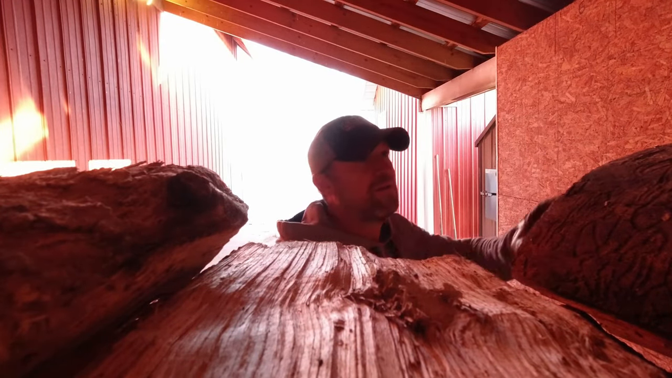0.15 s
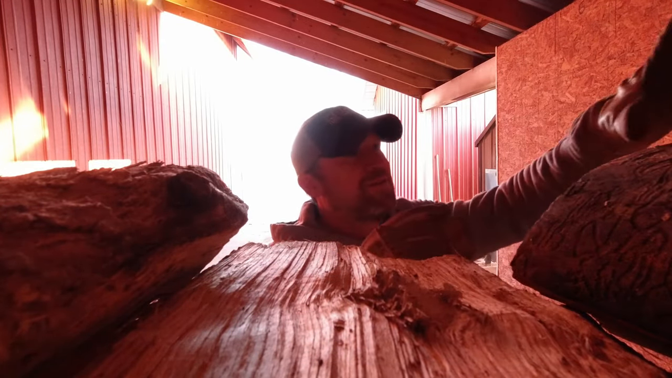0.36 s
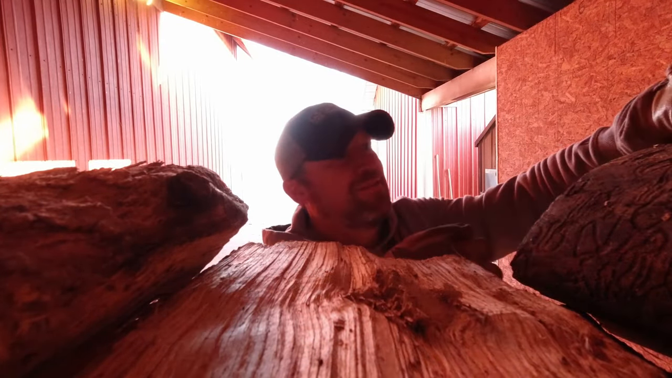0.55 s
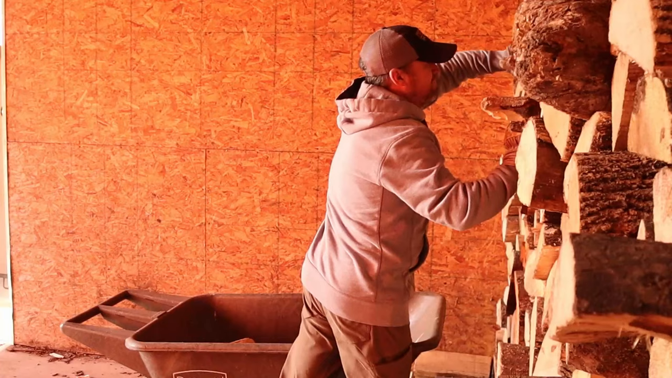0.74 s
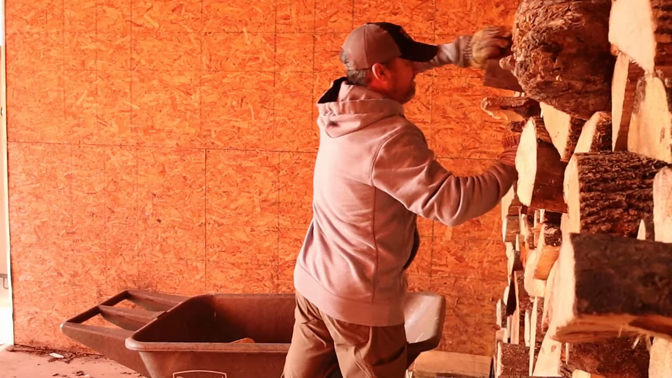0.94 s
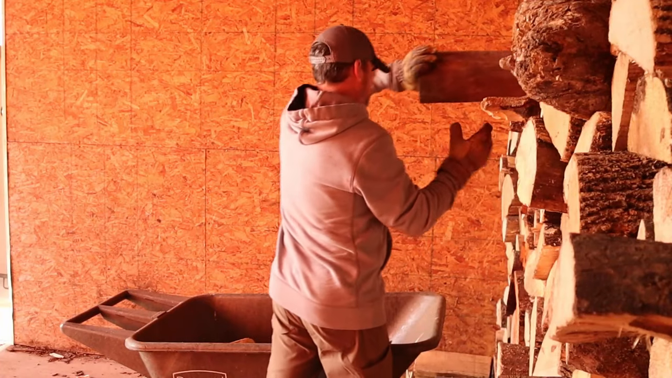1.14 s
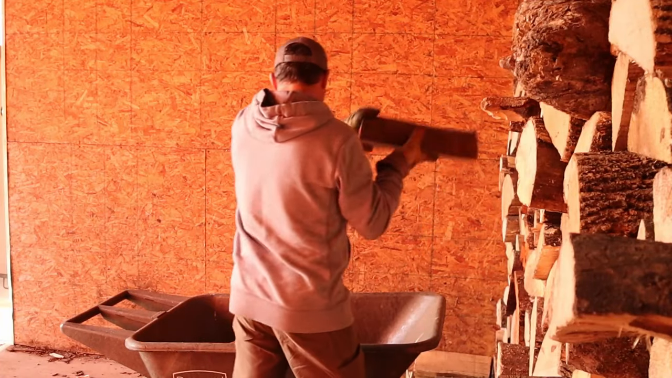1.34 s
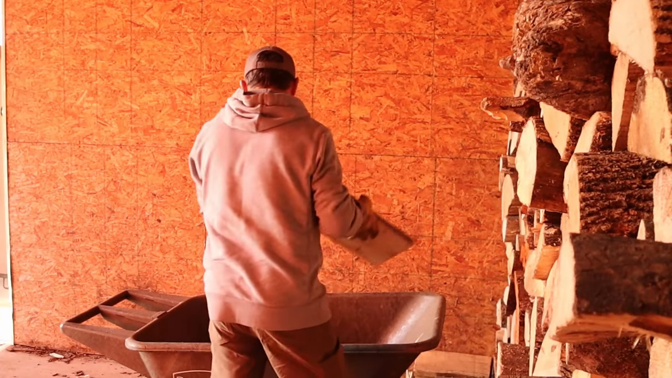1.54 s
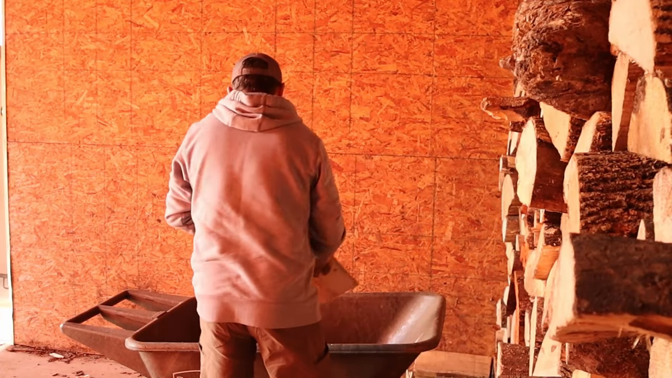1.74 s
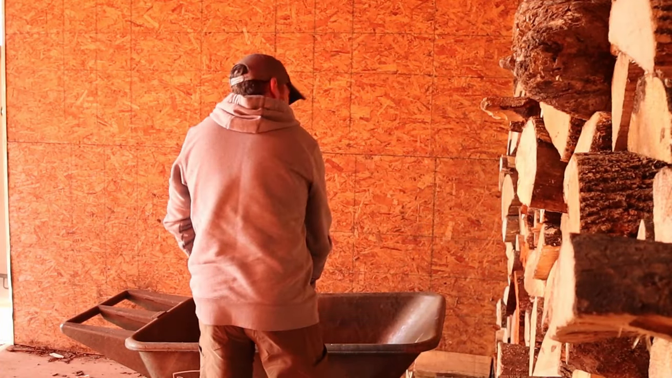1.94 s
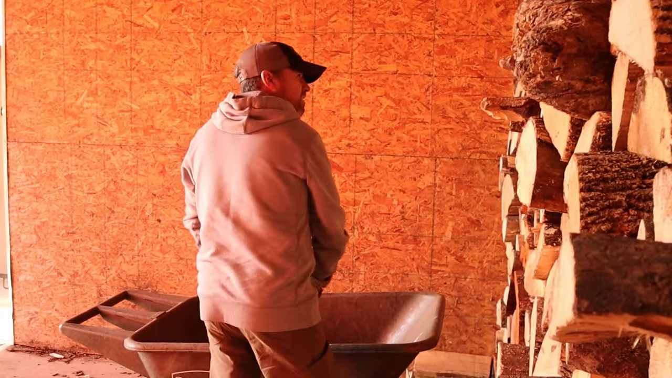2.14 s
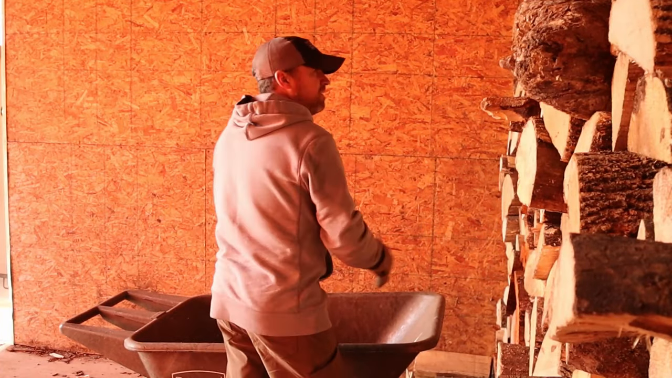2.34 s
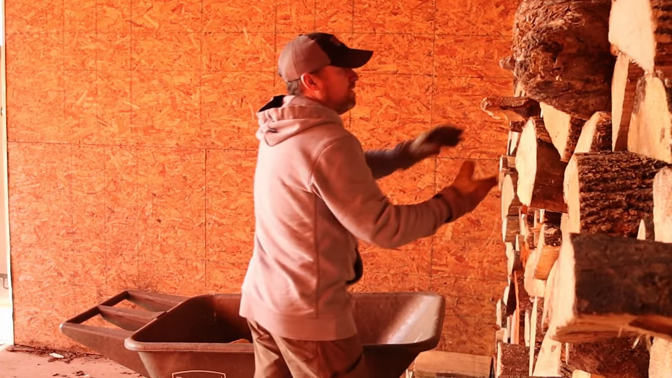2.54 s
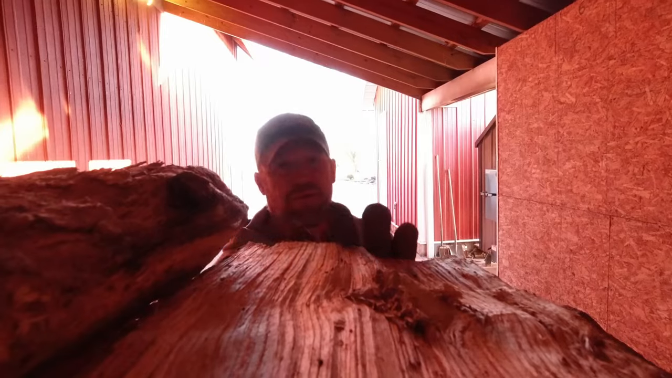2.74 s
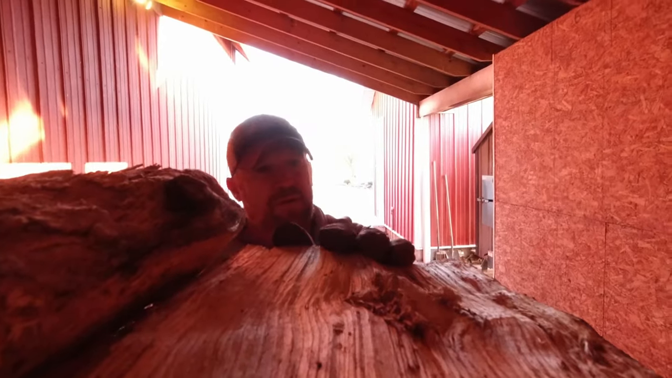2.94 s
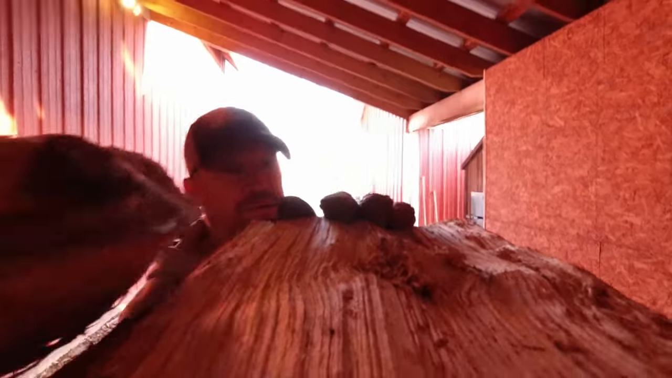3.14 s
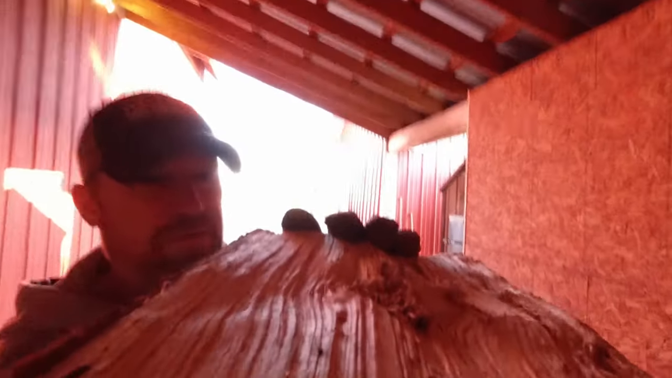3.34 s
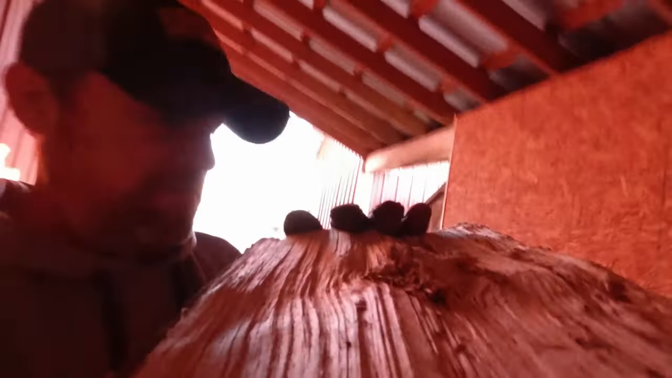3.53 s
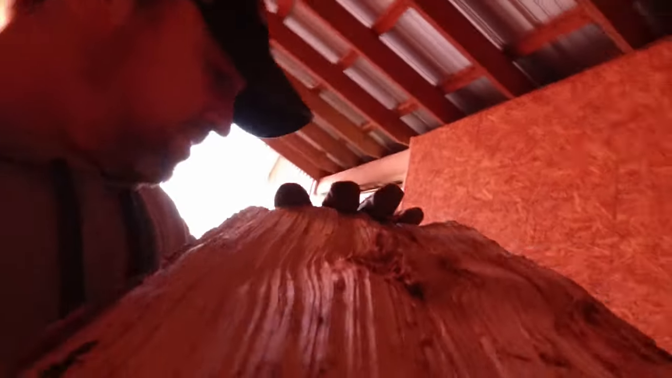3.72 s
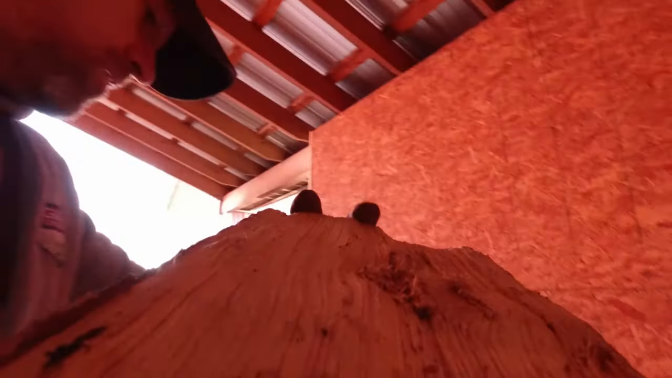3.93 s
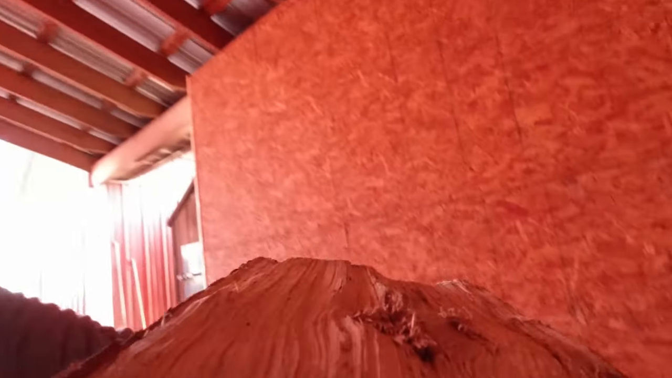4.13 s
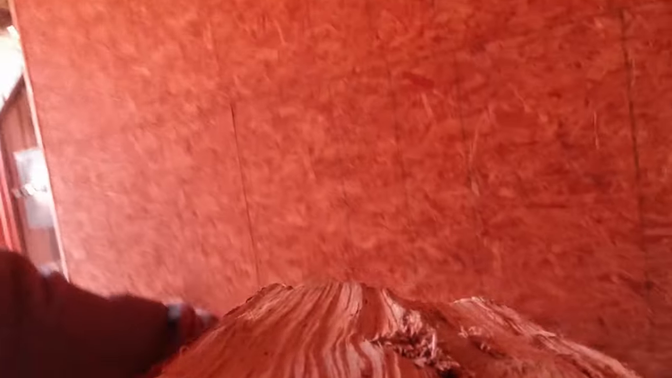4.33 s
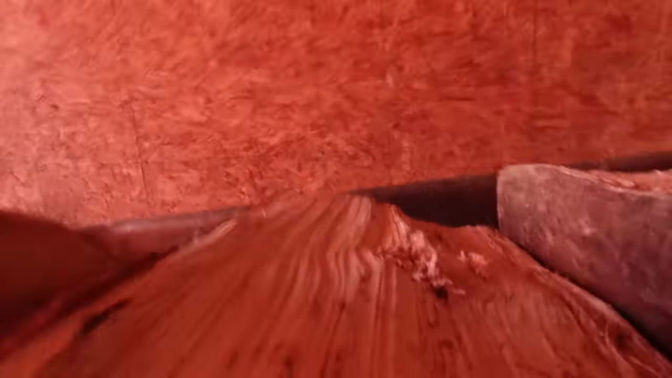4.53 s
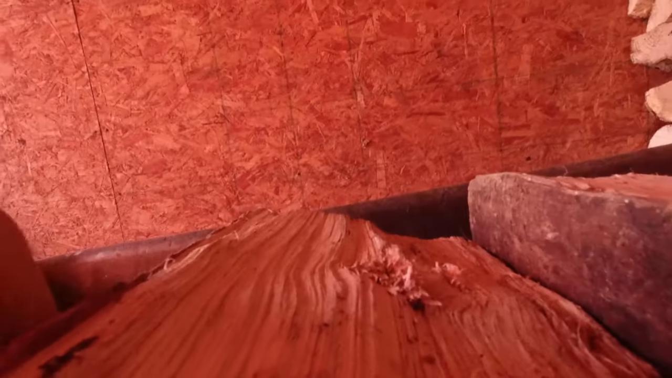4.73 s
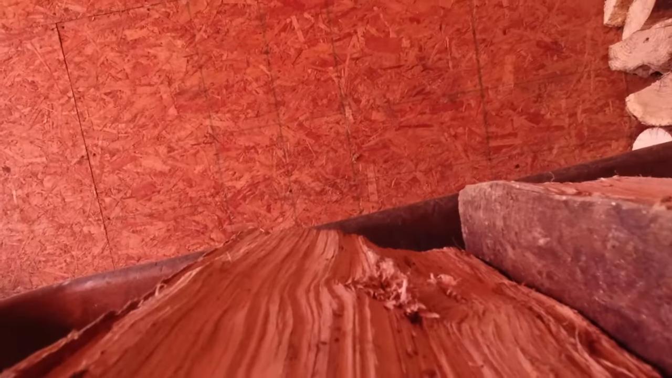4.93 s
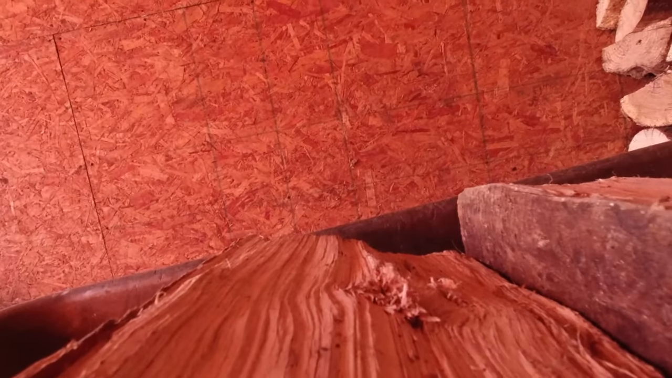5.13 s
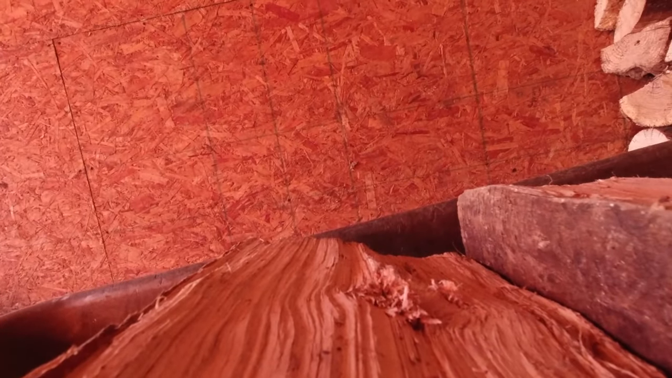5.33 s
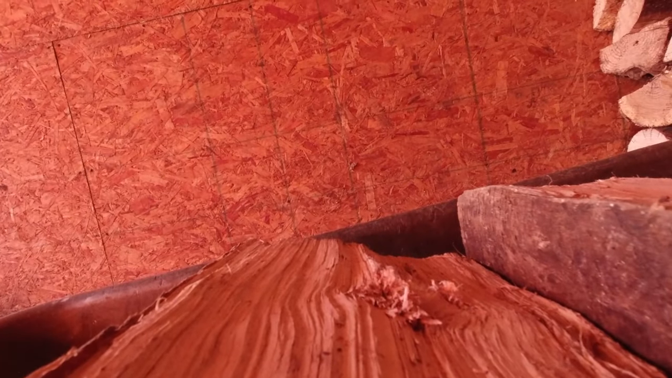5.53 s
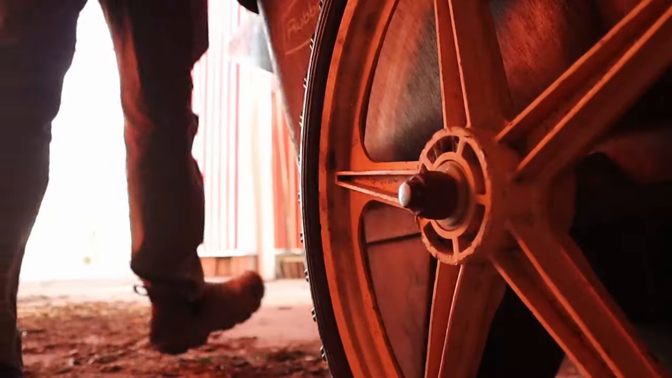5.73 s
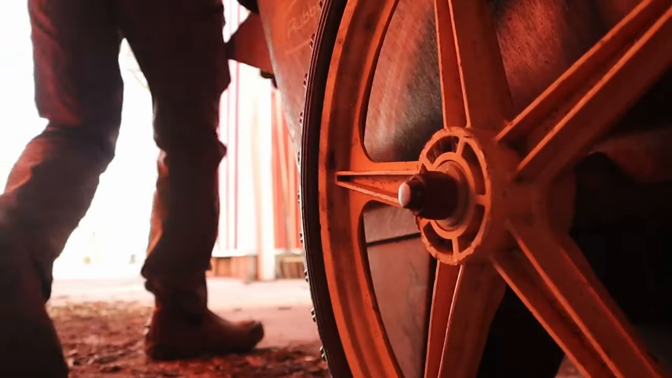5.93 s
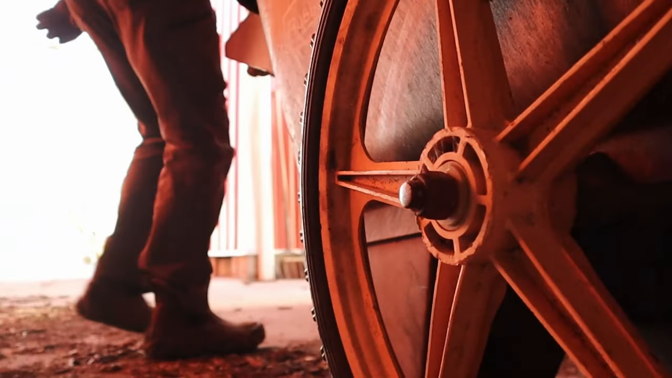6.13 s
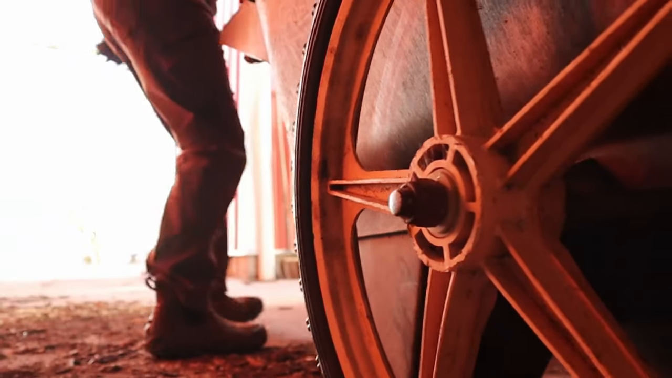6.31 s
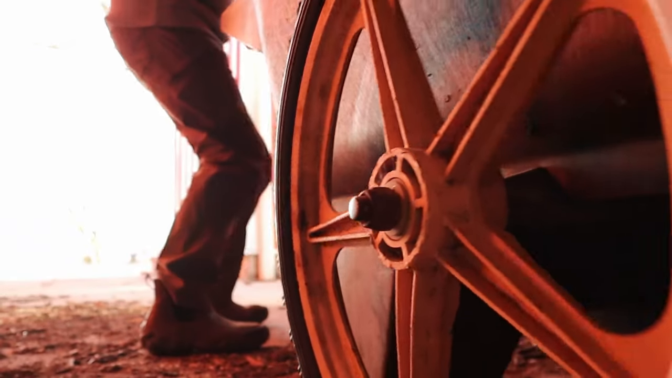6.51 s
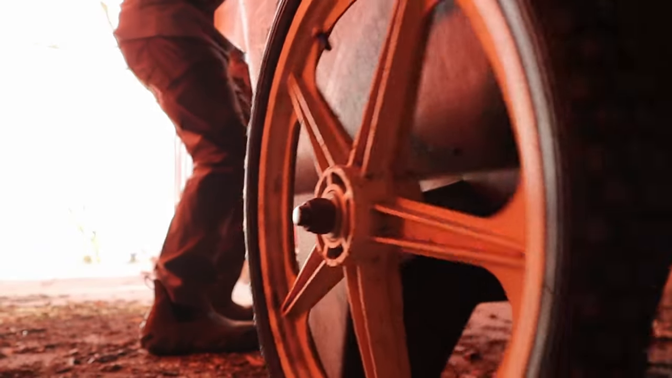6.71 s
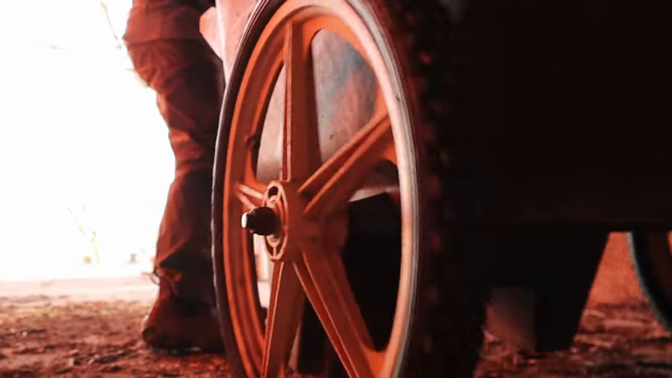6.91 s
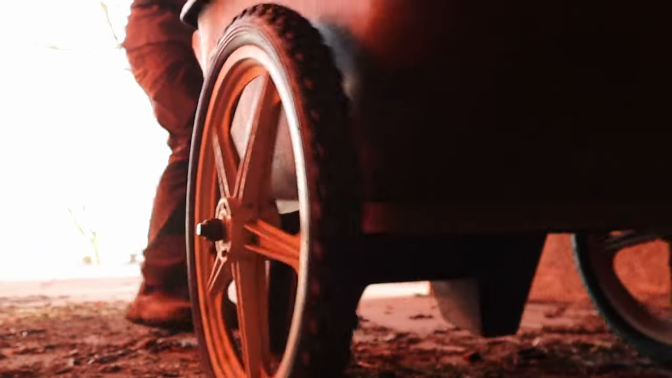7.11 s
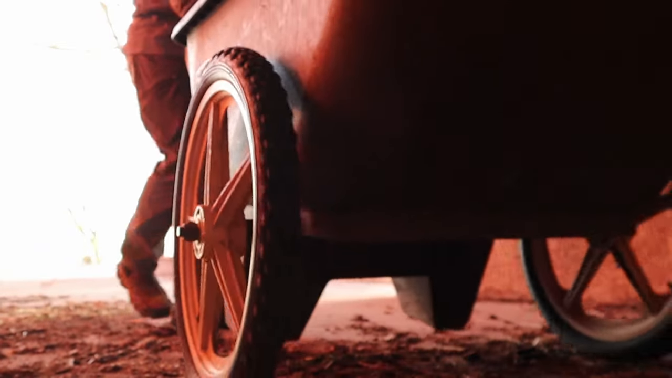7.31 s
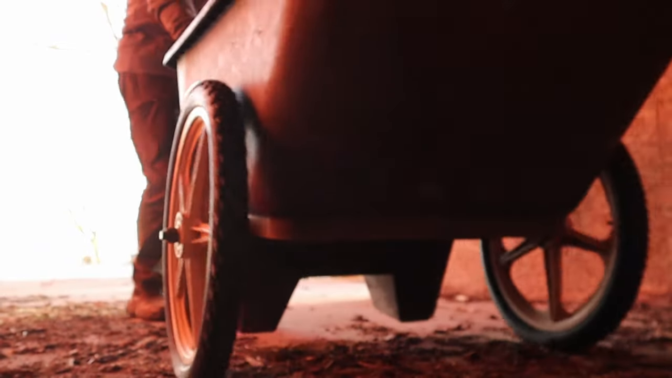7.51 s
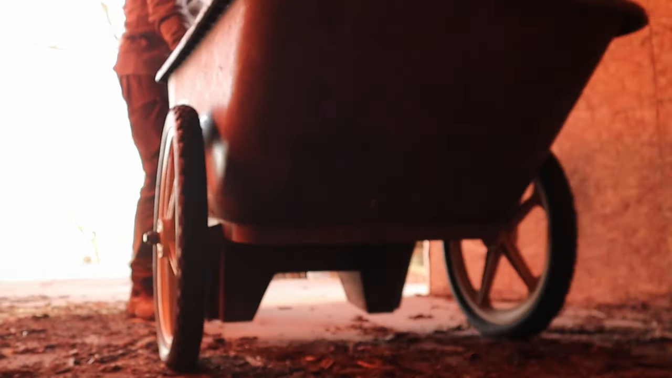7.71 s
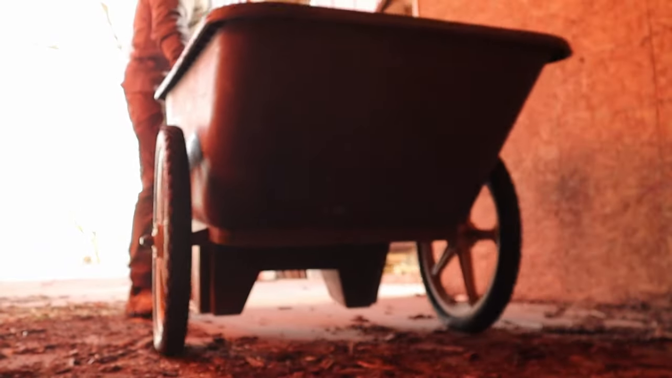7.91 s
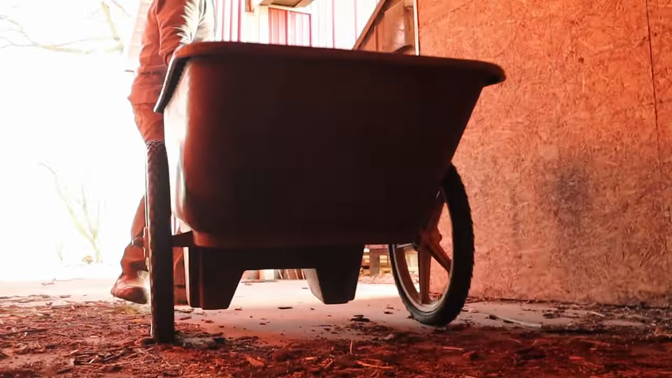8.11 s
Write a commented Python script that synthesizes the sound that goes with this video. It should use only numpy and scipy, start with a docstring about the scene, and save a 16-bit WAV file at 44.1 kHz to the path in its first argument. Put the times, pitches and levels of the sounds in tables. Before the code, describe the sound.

Three firewood drops into a deep plastic tub, each a hard woody crack with quick bounces and a low hollow boom, separated by dry scraping of gloves and bark and small knocks. The shed adds a short, faint tail. Then a sudden quiet cut to the floor beside the wheel: faint boot steps, followed by dense grinding and crackling of tyres on bark chips, with the load jolting and knocking.

```python
"""Wooden shed: split logs are pulled off a stack and dropped into a plastic cart; the hollow tub booms.
Gloves and bark scrape between drops, then the loaded cart rolls off over bark chips, crunching and knocking.
Blows are decaying noise bursts plus woody rings that push the tub's modes; scrapes are coloured noise
with tiny slips; the low modes are narrow noise and tones swelled by jolts; sparse taps make the shed's tail."""
import sys
import numpy as np
from scipy import signal
from scipy.fft import rfft, irfft
from scipy.io import wavfile
from scipy.ndimage import uniform_filter1d

SR = 44100
rng = np.random.default_rng(int(sys.argv[2]) if len(sys.argv) > 2 else 0)


def put_to_file(sound):
    """Save the sound as 16-bit audio at rate SR, in the file named by the first command-line argument."""
    columns = np.atleast_2d(sound).T  # one column per channel
    safe = np.clip(columns, -1, 1)
    whole_steps = np.round(safe * 32767)
    wavfile.write(sys.argv[1], SR, whole_steps.astype(np.int16))


N = 364266
ROLL_S = 5.71  # from here the microphone lies on the floor by the wheel

# logs landing and bouncing in the tub: [start_s, level_db, ring_hz, thump_db, crack_db, ring_db],
# the last three relative to level_db
DROPS = [(0.011, -12, 635, 1.5, -23, -8), (0.029, -20, 590, 11.5, -18, 0),
         (0.056, -15.5, 786, 3, -50, -4.5), (0.16, -21.5, 447, 12, -47, 2), (0.192, -22, 524, 15, -39, 1.5),
         (0.213, -30.5, 656, 3, -30, 8), (2.135, 4, 545, 0.5, -17, -5.5), (2.148, -3.5, 605, 4, -20, -3),
         (2.163, -2.5, 423, 5, -21, -3), (2.189, -4, 1170, -20, -9, -7.5), (2.223, -21, 1150, 12, -26, -9),
         (2.259, -5.5, 485, -13, -24, -7), (2.294, -17.5, 1260, 0.5, -18, 1.5),
         (2.323, -19, 665, 20.5, -29, 3.5), (2.359, -11.5, 577, -3, -34, -4.5),
         (2.389, -14.5, 570, -11, -35, -10), (2.468, -18.5, 645, -0.5, -40, -5.5),
         (2.499, -25, 660, 4, -37, -1.5), (4.535, -5.5, 980, -22, -9.5, -10.5),
         (4.55, 3.5, 407, -3.5, -11.5, -10), (4.57, -7.5, 745, -9, -25, -9), (4.629, -5, 925, -4, -10, -6),
         (4.649, -14.5, 890, 6.5, -21, -10), (4.689, -16, 710, 8.5, -16, -1),
         (4.729, -19, 670, 7, -38, 0.5), (4.749, -11.5, 1030, -6, -41, -6.5)]
# dull part of a log blow: [freq_hz, gain_db]
BLOW_BODY = [(150, -40.5), (250, 3), (403, 5), (473, -6.5), (764, -5.5), (861, 1), (920, -5.5), (3480, -23),
             (6000, -43.5), (7800, -66.5), (13200, -120)]
# bright edge of a log blow: [freq_hz, gain_db]
BLOW_CRACK = [(1200, -35), (2200, 7), (3200, 6), (5000, -4), (8000, -8.5), (12000, -14), (15700, -14.5)]


def drops():
    """Logs hit the tub: hard strikes, long rings, full boom."""
    return blows(DROPS, BLOW_BODY, BLOW_CRACK, cycles=10.3, overtone_db=-12.0, strike=3.9, splinter=0.36,
                 tub_db=-8.5, damping=1.07, shed_db=-6.5, t60_1khz_s=0.089)


# logs knocked while handled, and steps: columns as DROPS
# [start_s, level_db, ring_hz, thump_db, crack_db, ring_db]
TAPS = [(0.744, -18.5, 387, -15, -31, -2.5), (0.802, -20, 960, -32, -7, -1), (0.959, -28, 1570, -9, -24, 0),
        (1.028, -33, 1450, -27, -36, 3.5), (1.193, -23.5, 1470, -26, -24, 3),
        (1.227, -25, 1163, -2, -22, -8), (1.345, -18.5, 387, 7.5, -34, -8), (1.363, -23, 415, -4, -30, 1),
        (1.605, -20.5, 795, -20, -6, -2), (1.851, -33, 506, -21, -26, -3),
        (2.956, -33, 1600, -25, -27, 1.5), (3.162, -37.5, 2020, -17, 4, -3), (3.225, -37, 700, -12, 2, 3),
        (3.278, -36, 2120, -10, 6.5, -1.5), (3.441, -16.5, 1870, -1.5, -5, -1),
        (3.476, -36, 2400, -5, 8, 0), (3.59, -32, 525, 9.5, -26, -17), (3.633, -24.5, 1400, 0.5, 2.5, -1.5),
        (3.705, -20, 950, -14, -13, -1), (3.719, -20, 960, -40, -22, -3), (3.85, -36.5, 1020, -12, 9, 0),
        (3.894, -39.5, 3140, -34, 4, 7), (4.137, -24, 650, -8.5, -21, -1.5),
        (4.433, -34, 650, -18.5, -13, -3.5), (5.008, -31, 636, -15, -19, -1),
        (5.083, -27, 1100, -14, -3, 3.5), (5.574, -37.5, 423, -19.5, -17, 3),
        (5.593, -47, 412, -29, -11, -6), (5.836, -41.5, 1350, -19, 4, -1),
        (5.901, -26.5, 1510, -7, -8.5, -8), (5.927, -25.5, 1320, -30, -32, 0),
        (6.144, -37, 1470, -19.5, -25.5, -5)]


def taps():
    """Knocks and steps: the same wood spectra, shorter rings, tub more damped."""
    return blows(TAPS, BLOW_BODY, BLOW_CRACK, cycles=9.1, overtone_db=-9.0, strike=3.7, splinter=0.74,
                 tub_db=-3.3, damping=2.2, shed_db=-10.0, t60_1khz_s=0.036)


# bark chips cracking under the wheels and the load jolting: columns as DROPS
# [start_s, level_db, ring_hz, thump_db, crack_db, ring_db]
CRUNCH = [(6.224, -38, 1490, -7, -22, -1), (6.251, -23, 1380, -25, -18, -4),
          (6.318, -33.5, 1440, -26, -20, -3), (6.352, -23.5, 1440, -32, -44, -10),
          (6.402, -31.5, 560, -2, -18, -12), (6.437, -15.5, 462, -27, -16, -7),
          (6.454, -13, 1200, -20, -18, -16), (6.464, -19, 1235, -24, -28, 5),
          (6.479, -10.5, 1520, -19, -25, -4.5), (6.496, -14, 1060, -24, -25, -3),
          (6.51, -3.5, 1600, -34.5, -16, -4.5), (6.735, -30, 1200, -10, -24, -8),
          (6.788, -16.5, 1237, -7, -31, -7), (6.815, -8, 437, -27, -18.5, -10),
          (6.859, -4.5, 1290, -40, -36.5, -3), (6.877, -1, 1350, -37, -30, -10.5),
          (6.908, -26.5, 405, -8, -30, 4), (6.976, -11.5, 414, -17, -37, -8.5),
          (7.014, -2.5, 2090, -34, -15, -3.5), (7.039, -5.5, 1440, -18, -23, -4),
          (7.095, -15, 1370, -15.5, -16, -0.5), (7.141, -4.5, 1325, -55, -14, 0),
          (7.162, -2.5, 1400, -39, -22, -9), (7.17, -5.5, 1146, -27, -28, -2.5),
          (7.192, -5, 2100, -32, -19.5, -5), (7.206, -10, 1450, -28, -23, 2),
          (7.275, -14, 467, -1, -18, -2.5), (7.303, -3, 1900, -11, -44, -3),
          (7.325, -6, 704, -21, -9.5, -4), (7.372, 3.5, 460, -23, -10.5, -14),
          (7.384, -1.5, 546, -30, -24, -7), (7.395, -1, 710, -32.5, -18, -4),
          (7.456, -13, 740, -17, -37, -0.5), (7.545, -21, 730, -20, -41, -2), (7.611, -27, 690, 2, -15, -2),
          (7.659, -16, 630, 0, -6.5, -11), (7.682, -8, 910, -11, -16, -9),
          (7.708, -6, 1290, -37, -10.5, -17), (7.725, -7.5, 1140, -23, -7, -14),
          (7.739, -7.5, 696, -21, -32, -7.5), (7.856, -10.5, 2740, -27.5, -38, -0.5),
          (7.861, -5.5, 890, -2, -7, -5), (7.886, -9.5, 1170, -25, -3.5, -6),
          (7.903, -3.5, 743, -11, -36, 0.5), (7.918, -14, 390, -24, -32, 3),
          (8.045, -17, 686, -20.5, -20, -3.5), (8.091, -4.5, 740, -29, -12.5, -6),
          (8.109, -2, 930, -32, -13, -5.5), (8.128, -6.5, 700, -30, -20, -3),
          (8.149, -9.5, 820, -5.5, -6, -0.5), (8.164, -11, 627, -29, -20, -3),
          (8.219, -9, 1074, -43, -7.5, -7.5), (8.241, -20.5, 990, -3, -11, 0)]
# dull part of a crunch: [freq_hz, gain_db]
CRUNCH_BODY = [(180, -22), (300, -2), (605, -2), (704, -2), (999, -3.5), (1240, 1), (1780, -4),
               (2040, -3.5), (6000, -40), (7800, -64), (13200, -120)]
# bright edge of a cracking chip: [freq_hz, gain_db]
CHIP_CRACK = [(1200, -27), (2200, 3.5), (3500, -0.5), (6000, -18.5), (10000, -19.5), (12500, -46),
              (15700, -47)]


def crunches():
    """Chips crack and the load jolts: the most ragged bursts."""
    return blows(CRUNCH, CRUNCH_BODY, CHIP_CRACK, cycles=8.9, overtone_db=-20.0, strike=6.2, splinter=1.0,
                 tub_db=-7.0, damping=1.25, shed_db=-10.5, t60_1khz_s=0.067)


def blows(rows, dull, bright, cycles, overtone_db, strike, splinter, tub_db, damping, shed_db, t60_1khz_s):
    """Each blow: strike, ragged burst, bright crack, woody ring and a push into the tub; then the shed."""
    body, edge, wood, push = np.zeros((4, N + 5000))
    t = np.arange(5000) / SR
    impulse = t == 0
    for start_s, level_db, hz, thump_db, crack_db, ring_db in rows:
        body_noise, edge_noise, ring_noise, tear_noise = rng.standard_normal((4, len(t)))
        t60_s = np.clip(t60_1khz_s * (1000 / hz) ** 0.24, .005, .14)  # higher pieces die sooner
        fall = amp(-60 * t / t60_s) * np.minimum(t / 0.00088, 1)
        tears = (tear_noise > 2.6) * abs(body_noise)  # fibres give way in jerks
        fall *= 1 + splinter * signal.lfilter([1], [1, -.985], tears)
        hit = strike * impulse
        ring = resonate(ring_noise * fall + hit, hz, hz / cycles)
        overtone = resonate(ring_noise * fall, hz * rng.uniform(1.23, 2.27), 3 * hz / cycles)
        ring = ring + amp(overtone_db) * overtone
        thump = 0.4 * ring_noise * fall ** 2 / np.linalg.norm(fall ** 2) - impulse

        first = round(start_s * SR)
        span = slice(first, first + len(t))
        body[span] += amp(level_db) * (body_noise * fall + .5 * hit) / 4
        edge[span] += amp(level_db + crack_db) * (edge_noise * fall ** 1.38 + hit) / 2
        wood[span] += amp(level_db + ring_db) * peaked(resonate(ring, 1.21 * hz, 1.23 * hz))
        push[span] += amp(level_db + thump_db) * thump
    boom = signal.oaconvolve(push, tub(damping))[:N]
    hollow = band(wood[:N] + amp(tub_db) * boom, 64.0, 11000.0)
    dry = causal(body, dull) + causal(edge, bright) + hollow
    return dry + amp(shed_db) * shed(dry)


# tub modes: [freq_hz, gain_db, t60_s at damping 1]
TUB = [(54.3, -47.5, .25), (119, -34, 0.063), (129.9, -8.5, 0.24), (190.3, 1.5, 0.056), (250.4, 0, 0.09),
       (330, 0, 0.096), (412, -12, 0.17)]


def tub(damping):
    """Impulse response of the hollow tub: a sum of decaying modes."""
    t = np.arange(SR // 2) / SR
    modes = sum(amp(gain_db - 60 * damping * t / t60_s) * np.cos(2 * np.pi * hz * t)
                for hz, gain_db, t60_s in TUB)
    return modes * np.minimum(t / 0.0024, 1)


# narrow resonances heard during timed spans: [start_s, end_s, freq_hz, width_hz, gain_db]
RESONANCES = [(0.774, 0.95, 967, 28, 9), (0.785, 0.898, 2490, 39, 9), (0.916, 1.103, 1456, 32, 13.5),
              (2.163, 2.54, 1172, 12, 7.5), (2.177, 2.56, 2364, 39, 5.5), (3.087, 3.303, 2143, 40, 12),
              (3.184, 3.906, 989, 13, 9), (3.653, 3.786, 566, 35, 14.5), (3.695, 3.75, 2490, 28, 14.5),
              (5.073, 5.115, 4300, 30, 13), (0.997, 1.298, 2600, 37, -9), (0.752, 0.86, 577, 56, 12),
              (1.344, 1.406, 626, 90, 15), (4.39, 4.513, 2170, 120, 7), (5.054, 5.158, 1400, 290, 1),
              (1.566, 1.73, 1420, 150, 0.5), (6.9, 6.98, 3160, 150, 16)]


def resonances(x):
    """Narrow resonances heard during timed spans, driven by the blows and scrapes."""
    out = np.zeros(N)
    for start_s, end_s, hz, width_hz, gain_db in RESONANCES:
        a, b = round(start_s * SR), round(end_s * SR)
        drive = np.pad(x[a:b] * signal.windows.tukey(b - a, .2), (0, 8192))
        out[a:b + 8192] += amp(gain_db) * resonate(drive, hz, width_hz)
    return out


# gloves, bark, sliding logs, boots, tyres: [peak_s, rise_s, fall_s, grind_db, hiss_db, fizz_db];
# rise and fall span 20 dB
SCRAPES = [(0.018, 0.06, 0.15, -27.5, -47, -63), (.535, 0.018, 0.053, -76, -67, -55),
           (.62, 0.046, .3, -90, -69, -54), (.75, .01, .1, -44, -50, -52), (.81, 0.1, 0.094, -36, -43, -44),
           (1.09, 0.71, 0.41, -37.5, -38, -52), (1.24, 0.048, 0.11, -29, -38, -49),
           (1.36, .02, 0.17, -44.5, -54, -55), (1.62, 0.15, 0.22, -32, -36.5, -45.5),
           (1.83, 0.078, 0.089, -40.5, -46.5, -57), (2.0, 0.096, 0.22, -42.5, -37.5, -51.5),
           (2.133, 0.0076, .04, -25.5, -25, -42), (2.19, .01, 0.072, -29.5, -20.5, -44),
           (2.29, 0.27, 0.15, -26.5, -33, -67), (2.5, 0.039, .2, -49, -56, -67),
           (2.89, .03, 0.087, -57, -60, -74), (3.18, 0.1, 0.15, -54.5, -52, -49),
           (3.278, 0.44, 0.32, -43, -47, -56), (3.25, 0.045, .12, -46, -53, -49),
           (3.443, 0.01, 0.057, -36.5, -41, -40), (3.52, .08, 0.12, -55, -49, -55),
           (3.72, 0.45, 0.24, -41.5, -41, -48.5), (3.862, 0.14, 0.25, -61, -47.5, -55),
           (4.144, 0.35, 0.31, -47, -51.5, -64), (4.45, 0.16, 0.64, -39.5, -46, -55),
           (4.546, 0.023, 0.033, -22.5, -25, -35), (4.634, .02, 0.065, -34, -45, -45),
           (4.72, 0.042, 0.1, -25, -40.5, -65), (5.088, 0.08, 0.17, -34.5, -43.5, -54),
           (5.23, 0.23, 0.16, -52.5, -49, -53), (5.597, .04, 0.052, -45.5, -51, -53),
           (5.82, 0.13, 0.23, -58, -58, -66), (5.93, 0.1, 0.22, -46, -49, -59),
           (6.06, 0.11, 0.26, -58, -61, -65), (6.28, 0.092, 0.34, -49.5, -51.5, -61.5),
           (6.5, 0.11, 0.13, -27.5, -37.5, -50), (7.03, 0.041, .2, -28, -45, -62),
           (7.18, 0.055, 0.13, -25, -31, -62), (7.31, .02, 0.24, -19.5, -41, -67),
           (7.374, 0.032, 0.14, -19, -30.5, -52), (7.71, 0.048, 0.12, -24, -45, -71),
           (7.865, 0.0079, 0.15, -26, -35, -43), (8.105, 0.024, 0.24, -23, -31, -39)]
# loose wood and grit sliding on after a blow, rows grind, hiss, fizz:
# [fall_s over 20 dB, drop_db, crunch_db], levels relative to the blow
SLIDE = [(0.19, -23, -45), (0.038, -19, -14.5), (0.044, -40, -43)]
# slowly changing background noise, with a fade and sudden steps: [time_s, grind_db, hiss_db, fizz_db]
AIR = [(0, -62, -48, -67), (.7, -49, -76, -55), (.76, -52, -47, -59), (2.675, -53.5, -57.5, -61.5),
       (2.682, -61, -65.5, -71), (4.3, -65, -68, -62.5), (5.4, -57, -67.5, -71.5), (5.64, -65, -60, -75.5),
       (5.705, -76, -88, -85.5), (5.712, -62, -60.5, -71), (6.3, -73, -67, -83), (6.76, -43.5, -55.5, -64),
       (6.9, -34, -52, -63), (8.26, -27, -49, -66)]
# wood on wood: [freq_hz, gain_db]
GRIND = [(150, -7.5), (250, 0.5), (441, -3.5), (538, -2), (994, -1), (1100, 0.5), (1420, -4), (1840, -7),
         (4000, -35), (5200, -38), (8800, -120)]
# tyres on chips: [freq_hz, gain_db]
ROLL = [(150, -14), (250, -7), (407, 2), (525, 2.5), (753, 5), (1270, 4.5), (2860, -19), (3140, -25),
        (4000, -39), (5200, -79), (8800, -120)]
# hiss of the slips: [freq_hz, gain_db]
HISS = [(1470, -14.5), (2500, -1.5), (3000, -4), (4460, -4), (6120, -10), (7790, -16), (9000, -29),
        (11700, -58), (19800, -120)]
# fine fizz: [freq_hz, gain_db]
FIZZ = [(4710, -20.5), (8000, 1.5), (8730, 2.5), (13900, -6), (15100, -10), (15700, -3.5)]
ROLL_GRIT_S = 6.4  # from here the rolling noise has its own grit
HISS_DB_PER_CRACK_DB = 0.78  # fizz follows too


def rub():
    """Slipping contact: noise with slips, coloured as dull grind, hiss and fizz; tyres get their own slips."""
    peak_s, rise_s, fall_s, *scrape_db = np.transpose(SCRAPES)
    gains = []
    for k, (air_db, level_db, slide) in enumerate(zip(curves([AIR]), scrape_db, SLIDE)):
        slide_s, *under_db = slide
        power = amp(air_db) ** 2 + swells(peak_s, level_db, rise_s, fall_s)
        for rows, relative_db in zip((DROPS, CRUNCH), under_db):
            blow_s, blow_db, _, _, crack_db, _ = np.transpose(rows)
            slide_db = blow_db + relative_db + (k > 0) * HISS_DB_PER_CRACK_DB * crack_db
            power += swells(blow_s, slide_db, 0.004, slide_s)
        gains.append(np.sqrt(power))

    hands = gritty(per_s=300, spread_db=5.5, share=0.22)
    tyres = gritty(per_s=280, spread_db=3.0, share=0.41)
    on_floor = np.arange(N) > ROLL_S * SR
    tyres = np.where(np.arange(N) > ROLL_GRIT_S * SR, evened(tyres), evened(hands))
    grit = np.where(on_floor, tyres, hands)
    grind = np.where(on_floor, evened(colour(tyres, ROLL)), evened(colour(hands, GRIND)))
    hiss = evened(colour(grit, HISS))
    fizz = evened(colour(hands, FIZZ))
    return gains[0] * grind + gains[1] * hiss + gains[2] * fizz


def gritty(per_s, spread_db, share):
    """White noise mixed with noise bursts from random slips of uneven size."""
    slips = amp(spread_db * np.minimum(rng.exponential(1, N), 5)) * (rng.random(N) < per_s / SR)
    bursts = signal.lfilter([1], [1, -np.exp(-1 / (0.0037 * SR))], slips)
    return rng.standard_normal(N) * (1 - share + share * evened(bursts))


# tub, stack or cart jolted: [peak_s, fall_s, boom_db, upper_boom_db, rumble_db, clatter_db];
# fall spans 20 dB, any fall below 0.01 s plays as 0.01 s
JOLTS = [(0.028, 0.047, -25, -7.5, -26, -24), (.075, 0.11, -22, -17.5, -26, -32),
         (.14, 0.12, -15, -27, -40, -27), (.2, 0.06, -14, -33, -41, -34),
         (.245, 0.0754, -13.5, -26, -42, -28), (.43, -0.1, -58, -41, -45, -53),
         (.97, 0.16, -55, -54, -25.5, -55), (1.16, 0.43, -40, -47, -35.5, -54),
         (1.27, 0.4, -52, -42, -31, -34.5), (1.39, 0.12, -36, -36, -26, -32.5),
         (1.48, 0.18, -34.5, -52, -42, -58), (2.164, 0.1356, -12.5, -8.5, -42, -40),
         (2.236, 0.09, -14.5, -31, -46, -16), (2.322, 0.02, -14.5, -12.5, -21, -13.5),
         (2.378, 0.0534, -11.5, -35, -31, -17), (2.51, 0.08, -28, -32, -34, -39),
         (2.8, -0.1, -44, -50, -36, -61), (3.02, .3, -41, -71, -56, -64),
         (3.344, 0.2, -53, -37, -32.5, -48), (3.445, .1, -27, -25, -22.5, -48),
         (3.601, 0, -36, -27, -32, -51), (3.651, 0.14, -42, -32, -35, -56),
         (4.585, 0.1851, -11, -24, -20, -37), (4.635, .12, -15, -16, -18, -29),
         (4.73, -0.03, -24.5, -16, -24, -33), (4.8, 0.18, -14.5, -30, -36, -37),
         (4.87, -0.04, -33, -41, -38.5, -41.5), (4.962, -0.05, -21.5, -40, -44, -52),
         (5.05, 0.16, -29, -38.5, -38, -46), (6.06, -0.33, -37, -58, -49, -50),
         (6.27, 0.3, -49, -51, -53, -62), (6.5, .15, -43, -39, -46, -55), (6.88, 0, -31, -50, -58, -39),
         (7.34, 0.12, -28, -33, -46, -20), (7.39, 0.1, -32, -17.5, -46, -29),
         (7.45, 0.07, -24, -27, -36, -23), (7.77, -2, -23, -31, -39.5, -34),
         (7.91, 0.1, -25, -23.5, -40, -20), (8.05, 0.6, -66, -33, -54, -27.5),
         (8.168, -0.25, -31, -25, -49, -17.5)]
# rise over 20 dB, one per low mode (boom, upper boom, rumble, clatter): [rise_s]
JOLT_RISE_S = [0.028, 0.045, 0.061, 0.051]
# low modes between blows: [time_s, boom_db, upper_boom_db, rumble_db, clatter_db]
LOW = [(0, -34, -48, -43, -59), (.9, -43, -47, -35, -48), (1.6, -51.5, -45, -38, -45),
       (2.0, -53, -63, -54.5, -58), (2.65, -35.5, -41, -37, -51), (2.9, -41.5, -57, -45, -56.5),
       (3.25, -44.5, -55, -38.5, -70), (3.85, -46, -49.5, -43, -58), (4.3, -55, -73, -48, -54),
       (5.2, -45.5, -62, -51, -56.5), (5.45, -47, -72, -55, -85), (5.706, -65.5, -79, -73.5, -90),
       (5.712, -67, -67, -50, -70.5), (5.9, -50.5, -58, -47.5, -59), (6.65, -61, -63, -56, -66),
       (7.0, -38.5, -41, -49, -41), (7.6, -42, -40, -49, -36.5), (8.26, -38, -34, -55, -47)]
# power share ringing as a clean tone (boom, upper boom): [share]
CLEAR = [.5, .2]
BOOM_HZ, AXLE_HZ = 130.6, 105.2  # main low mode of the standing tub, of the rolling cart


def shake():
    """Random pushes keep the tub's two main modes, floor and side walls moving; each jolt swells them."""
    boom_hz = np.where(np.arange(N) > ROLL_S * SR, AXLE_HZ, BOOM_HZ)
    a, b, c, d = rng.standard_normal((4, N))
    boom = resonate(resonate(a, boom_hz, 12.6), boom_hz, 42.0)
    upper = resonate(resonate(d, 171.5, 34.0), 193.0, 88.0)
    rumble = resonate(resonate(b, 37.0, 59.0), 50., 72.0)
    clatter = resonate(resonate(c, 270.0, 330.0), 277.0, 280.0)

    wobble = 0.01204 * evened(uniform_filter1d(b, size=8000))
    tone_hz = [boom_hz * (1 + wobble), np.full(N, 184.)]
    turns = np.cumsum(tone_hz, axis=1) / SR
    boom, upper = (np.sqrt(1 - k) * evened(x) + np.sqrt(2 * k) * np.sin(2 * np.pi * u)
                   for x, u, k in zip((boom, upper), turns, CLEAR))

    peak_s, fall_s, *jolt_db = np.transpose(JOLTS)
    out = np.zeros(N)
    for x, low_db, level_db, rise_s in zip((boom, upper, rumble, clatter), curves([LOW]), jolt_db, JOLT_RISE_S):
        power = amp(low_db) ** 2 + swells(peak_s, level_db, rise_s, fall_s)
        out += np.sqrt(power) * steadied(x, size=3000)
    return out


# shed decay: [freq_hz, t60_s]
SHED = [(100, 0.33), (500, 0.39), (2000, 0.3), (6000, 0.35), (14000, 0.11)]


def shed(x):
    """Reverberation: sparse taps of random sign, each band dying at its own speed."""
    echoes = np.zeros(SR)
    at = np.arange(300, SR - 20, 20)
    echoes[at + rng.integers(0, 20, len(at))] = rng.choice([-1., 1.], len(at))
    hz, t, z = signal.stft(echoes, SR, nperseg=256)
    tail = signal.istft(z * amp(-60 * t / read(SHED, hz)[:, None]), SR, nperseg=256)[1]
    return signal.fftconvolve(x, tail / np.linalg.norm(tail))[:N]


# side over mid of the two microphone ports, before the width gain: [freq_hz, gain_db]
SIDE_DB = [(60, -11), (110, -20.5), (200, -17.5), (380, -23.5), (700, -19), (1290, -4.5), (2380, -5),
           (4400, -0.5), (8120, -13.5), (15000, 1)]
# spans where the stereo sound is wider: [start_s, end_s, width_db, bass_width_db]
WIDE = [(0.64, 0.742, -2, -11), (2.868, 3.15, -2, -7), (3.12, 3.9, 4, 9), (3.9, 4.502, -1, -6),
        (4.497, 4.717, 3.5, 0), (4.722, 5.062, -15, -22), (5.045, 5.704, -55.5, -16.5)]


def ports(mid):
    """Two close ports: their difference is the same sound with scattered phase."""
    z = signal.stft(mid, nperseg=512)[2]
    scattered = signal.istft(z * np.exp(2j * np.pi * rng.random(z.shape)), nperseg=512)[1][:N]
    side = colour(scattered, SIDE_DB)
    bass = signal.sosfiltfilt(signal.butter(4, 320., fs=SR, output="sos"), side)
    t, width = np.arange(N) / SR, np.full((2, N), amp(-71.5))
    for start_s, end_s, *width_db in WIDE:
        width[:, (t > start_s) & (t < end_s)] = amp(width_db)[:, None]
    width = uniform_filter1d(width, size=400, axis=1)
    side = width[0] * (side - bass) + width[1] * bass
    return np.array([mid + side, mid - side])


def amp(db):
    """Decibels to gain."""
    return 10 ** (np.asarray(db) / 20)


def evened(x):
    """Scales to rms 1."""
    return x / np.sqrt(np.mean(x ** 2) + 1e-20)


def peaked(x):
    """Scales to peak 1."""
    return x / (abs(x).max() + 1e-12)


def read(points, hz):
    """Reads a table on a log-frequency axis."""
    f, value = np.transpose(points)
    return np.interp(np.log(hz + 1), np.log(f + 1), value)


def curves(tables):
    """Each column at every sample."""
    s, *columns = np.vstack(tables).T
    return [np.interp(np.arange(N) / SR, s, c) for c in columns]


def swells(peak_s, level_db, rise_s, fall_s):
    """Summed power of many swells, each rising to its peak and falling straight in dB."""
    t = np.arange(0, N / SR, .001)
    late_s = t[:, None] - peak_s
    rise, fall = -late_s / np.maximum(rise_s, .002), late_s / np.maximum(fall_s, .01)
    swell_db = level_db - 20 * np.where(late_s < 0, rise, fall)
    return np.interp(np.arange(N) / SR, t, (amp(swell_db) ** 2).sum(1))


def colour(x, points):
    """Filters x by the gains of the points."""
    return irfft(rfft(x) * amp(read(points, np.fft.rfftfreq(len(x), 1 / SR))), len(x))


def causal(x, points):
    """Colours x with a minimum-phase response starting at each blow; energy 1."""
    gain_db = np.maximum(read(points, abs(np.fft.fftfreq(4096, 1 / SR))), -100)
    spectrum = np.exp(signal.hilbert(np.log(amp(gain_db))).conj())
    response = np.fft.ifft(spectrum).real[:2048]
    return signal.oaconvolve(x, response / np.linalg.norm(response))[:N]


def resonate(x, hz, width_hz):
    """Resonator: shifts hz down to zero, smooths, and shifts back."""
    turn = np.exp(2j * np.pi * np.cumsum(hz * np.ones(len(x))) / SR)
    r = np.exp(-np.pi * width_hz / SR)
    return 2 * (turn * signal.lfilter([1 - r], [1, -r], x / turn + 1e-18)).real


def band(x, low_hz, high_hz):
    """Gentle band-pass."""
    return signal.sosfilt(signal.butter(2, [low_hz, high_hz], "band", fs=SR, output="sos"), x)


def steadied(x, size):
    """Takes out most of the slow chance swell of a narrow noise; rms 1."""
    return evened(x / np.sqrt(uniform_filter1d(x ** 2, size=size) + 0.19 * np.mean(x ** 2)))


def scene():
    """Sums all sources and spreads them over two close ports."""
    wood = drops() + taps() + rub()
    return ports(wood + resonances(wood) + crunches() + shake())


def record(dry):
    """The microphone loses the deepest bass, peaks overload the input; then the band limit."""
    highpass = signal.butter(3, 33., "high", fs=SR, output="sos")
    clipped = np.clip(signal.sosfilt(highpass, dry), -.99, .99)
    edge_hz = 15860
    lowpass = signal.firwin(511, edge_hz, window=("kaiser", 9), fs=SR)
    return signal.oaconvolve(clipped, lowpass[None], "same")


dry = scene()
out = record(dry)
put_to_file(out)
```